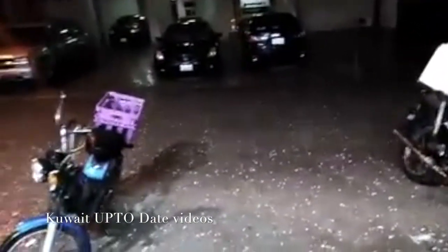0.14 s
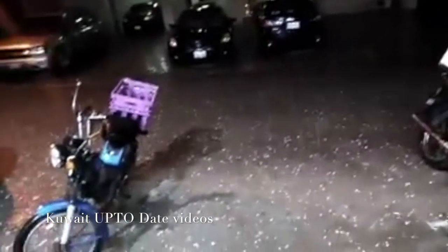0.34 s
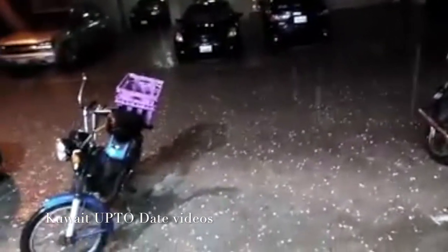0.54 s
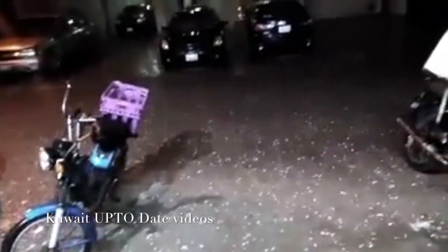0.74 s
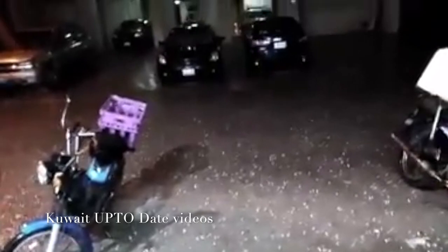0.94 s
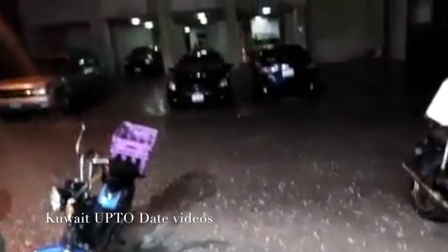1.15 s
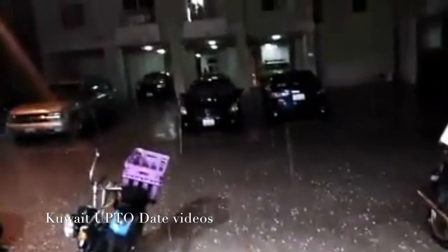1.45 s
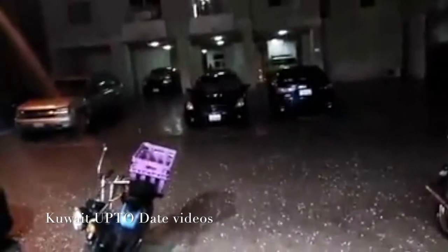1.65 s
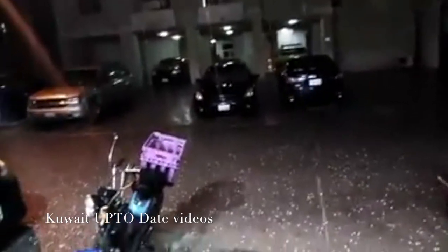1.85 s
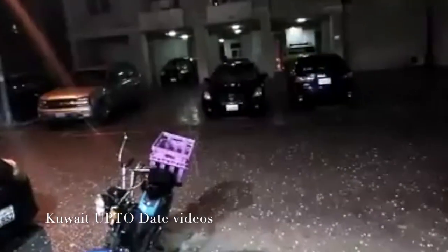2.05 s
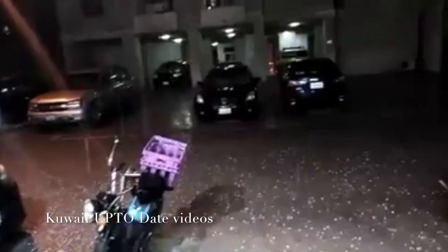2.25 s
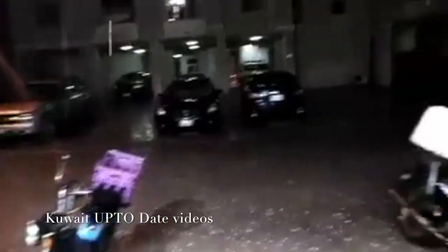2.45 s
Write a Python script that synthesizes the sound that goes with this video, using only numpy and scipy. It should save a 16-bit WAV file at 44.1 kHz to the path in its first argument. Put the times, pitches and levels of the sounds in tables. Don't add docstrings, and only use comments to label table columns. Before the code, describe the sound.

Dense hail hisses and crackles on a paved yard, drumming in flurries on car roofs

```python
import sys
import numpy as np
from scipy import signal
from scipy.fft import rfft, irfft, next_fast_len
from scipy.io import wavfile
from scipy.ndimage import uniform_filter1d

SR = 44100
rng = np.random.default_rng(int(sys.argv[2]) if len(sys.argv) > 2 else 0)


def gain_from_db(level_db):
    decades = np.asarray(level_db, float) / 20
    return 10 ** decades


def generate_wav(signal):
    frames = np.transpose(np.atleast_2d(signal))
    scaled = np.clip(frames, -1, 1) * 32767
    pcm = np.round(scaled).astype(np.int16)
    wavfile.write(sys.argv[1], SR, pcm)


N = 114660
TIME_S = np.arange(N) / SR

SPLIT_HZ, TOP_EDGE_HZ = 4520, 15400


def rms_one(x):
    return x / np.sqrt(np.mean(x ** 2) + 1e-20)


def at_hz(points, hz):
    table_hz, value = np.transpose(points)
    return np.interp(np.log(hz), np.log(table_hz), value)


def drift(rate_hz):
    r = np.exp(-80 * np.pi * rate_hz / SR)
    noise = rng.standard_normal(N // 40 + 2002)
    slow = signal.lfilter([1], [1, -2 * r, r * r], noise)[2000:]
    return np.interp(np.arange(N) / 40, np.arange(len(slow)), rms_one(slow))


def shaped(x, response):
    size = next_fast_len(N + 4096)
    hz = np.arange(1, size // 2 + 2) * SR / size
    return irfft(rfft(x, size) * response(hz), size)[:N]


def window(start_s, end_s):
    return np.interp(TIME_S, [start_s - .0001, start_s, end_s, end_s + .0001], [0, 1, 1, 0])


def impacts(per_s):
    size_spread_db = 2.5
    sizes = gain_from_db(size_spread_db * np.minimum(rng.exponential(1, N), 5))
    signs = rng.choice([-1, 1], N)
    return sizes * signs * (rng.random(N) < per_s / SR)


# start_s, level_db
FLURRY_LEVELS = [(0, -20.5), (.15, -20), (.5, -19.5), (.6, -20), (.72, -16.5), (.8, -22.5), (.97, -18.5),
                 (1.08, -22.5), (1.22, -15.5), (1.29, -22), (1.35, -15.5), (1.519, -22.5), (1.76, -19.5),
                 (1.842, -18.5), (1.939, -16), (2.02, -24), (2.2, -20.5), (2.6, -21.5)]


def flurry_db():
    start_s, level_db = np.transpose(FLURRY_LEVELS)
    return np.interp(TIME_S, start_s, level_db - level_db.mean())


def roofs():
    gain_db, follows_flurries = -22.5, 1.25
    hits_per_s, ring_cycles = 3000, 12.7
    hits = impacts(hits_per_s) + 1e-18
    struck_mode = rng.integers(0, 24, N)
    ringing = 0
    for mode, hz in enumerate(np.geomspace(349, 3094, 24)):
        r = gain_from_db(-60 * hz / (ring_cycles * SR))
        w = 2 * np.pi * hz / SR
        resonator = [0, np.sin(w)], [1, -2 * r * np.cos(w), r * r]
        ringing = ringing + np.sqrt(hz) * signal.lfilter(*resonator, hits * (struck_mode == mode))
    ringing = rms_one(shaped(ringing, lambda hz: hz < SPLIT_HZ))
    return gain_from_db(follows_flurries * flurry_db() + gain_db) * ringing


def paving(spectrum, low_hz, high_hz, patchy_db, gust_db):
    stones_per_s = 14000
    ticks = [impacts(stones_per_s), impacts(stones_per_s)]
    gust = drift(2.5)
    hail = 0
    edges_hz = 25 * 2 ** (np.arange(30) / 3)
    for k, (low, high) in enumerate(zip(edges_hz, edges_hz[1:])):
        if high > low_hz and low < high_hz:
            bandpass = signal.butter(2, [low, high], "band", fs=SR, output="sos")
            band = signal.sosfilt(bandpass, ticks[k % 2])
            hail = hail + band * gain_from_db(patchy_db * drift(12.6) + gust_db * gust)
    return rms_one(shaped(hail, lambda hz: gain_from_db(at_hz(spectrum, hz)) * (hz > low_hz) * (hz < high_hz)))


# pitch_hz, level_db
BODY_COLOUR = [(30, -28), (63, -19.5), (120, -3.5), (300, -6), (500, -9.5), (1300, -5), (2500, -2.5),
               (4400, -3.5)]


def paving_body():
    gain_db, follows_flurries = -12.5, 0.33
    hail = paving(BODY_COLOUR, 20, SPLIT_HZ, patchy_db=1.04, gust_db=0.31)
    return gain_from_db(gain_db + follows_flurries * flurry_db()) * hail


# pitch_hz, level_db
TOP_COLOUR = [(4600, -1.5), (6530, 1), (7600, -1.5), (9370, -4), (12700, -5.5), (13100, -10), (14500, -11),
              (15500, -13)]


def paving_top():
    gain_db, follows_flurries = -13.5, 0.057
    hail = paving(TOP_COLOUR, SPLIT_HZ, TOP_EDGE_HZ, patchy_db=1.0, gust_db=0.28)
    return gain_from_db(gain_db + follows_flurries * flurry_db()) * hail


def thinned(x, low_hz, frame, lines, share):
    hole_db, weak_share = -22, 0.73
    hz, _, z = signal.stft(x, SR, nperseg=frame)
    weak = abs(z) < weak_share * uniform_filter1d(abs(z), size=16, axis=0)
    luck = np.kron(rng.random(z.shape), np.ones((lines, 2)))[:len(hz), :z.shape[1]]
    lost = (weak | (luck < share)) & (hz[:, None] > low_hz)
    return signal.istft(z * np.where(lost, gain_from_db(hole_db), 1), SR, nperseg=frame)[1][:N]


def late_copy(hz):
    lead_lag, plain_lag, plain_hz = 23, 824, 8625

    def lag(samples):
        return np.exp(-2j * np.pi * hz * samples / SR)

    chain = lag(lead_lag)
    for samples, gain in [(202, 0.55), (279, 0.52), (314, 0.56)]:
        g = np.clip(gain * (1.1 - hz / plain_hz), 0, .9)
        chain = chain * (lag(samples) - g) / (1 - g * lag(samples))
    return -np.where(hz < plain_hz, chain, lag(plain_lag))


# pitch_hz, level_db
COPY_LEVEL = [(60, -8.5), (130, -18.5), (290, -9.5), (640, -8), (1410, 0), (3100, -2), (6820, 0.5),
              (15000, -0.5)]
# pitch_hz, left_minus_right_db
LEFT_LEAN = [(100, -1), (400, -2.5), (1200, 0), (2500, 1.5), (6400, 4), (8400, 3.5), (8700, -4.5),
             (15000, -3.5)]


def widened(x):
    loose_share = .3

    def centre(hz):
        return 1 / np.sqrt(1 + gain_from_db(2 * at_hz(COPY_LEVEL, hz)))

    def side(hz):
        whole = gain_from_db(at_hz(COPY_LEVEL, hz))
        lean = np.tanh(at_hz(LEFT_LEAN, hz) * np.log(10) / 20) * (1 + whole ** 2) / 2
        lean = np.clip(lean, -whole, whole)
        return centre(hz) * (lean + np.sqrt(whole ** 2 - lean ** 2) * late_copy(hz))

    loose = shaped(np.roll(x, N // 3), lambda hz: centre(hz) * gain_from_db(at_hz(COPY_LEVEL, hz)))
    tied = shaped(x, side)
    return shaped(x, centre), np.sqrt(1 - loose_share ** 2) * tied + loose_share * loose


# dull_start_s, right_mute_s, full_again_s, width_start_s, width_back_s
FALTER_TIMES = [
    (.7725, .7815, .787, .796, .83),
    (1.763, 2.0615, 2.067, 2.07, 2.105),
]


def falters():
    linger_s, linger_db, mute_db = .022, -30, -24
    dull, width, right, thin = np.zeros(N), np.ones(N), np.ones(N), np.zeros(N)
    for start, mute, full, opens, back in FALTER_TIMES:
        trace = gain_from_db(linger_db) * window(start, min(full, start + linger_s))
        dull = dull + window(start, full) - trace
        width = width * np.interp(TIME_S, [start - .0004, start, opens, back], [1, 0, 0, 1])
        right = right * (1 - (1 - gain_from_db(mute_db)) * window(mute, full))
        thin = thin + window(full + 0.00046, full + .0085)
    return dull, width, right, thin


def scene():
    body = thinned(paving_body() + roofs(), low_hz=1300, frame=3760, lines=5, share=.15)
    top = thinned(paving_top(), low_hz=4500, frame=3760, lines=5, share=.05)
    top = thinned(top, low_hz=13900, frame=2600, lines=18, share=.4)
    centre, side = widened(body + top)
    dull, width, right, thin = falters()

    mono_lift_db, tick_s, tick_db = 0.5, 1.929, -21
    bass = shaped(body, lambda hz: hz < 1100)
    tick = gain_from_db(tick_db) * (np.arange(N) == int(tick_s * SR))
    mono = gain_from_db(mono_lift_db) * (body - thin * bass) + (1 - dull) * top + tick

    gap = 1 - (1 - gain_from_db(-17)) * window(1.763, 1.772)
    mid = (width * centre + (1 - width) * mono) * gap
    return np.array([mid + width * side, (mid - width * side) * right])


def band_limit(x):
    return signal.sosfilt(signal.butter(12, 15660, fs=SR, output="sos"), x)


def record(dry):
    overload = 1.15
    rumble_cut = signal.butter(2, 70, "high", fs=SR, output="sos")
    heard = np.clip(signal.sosfilt(rumble_cut, dry), -overload, overload)
    return band_limit(heard)


dry = scene()
out = record(dry)
generate_wav(out)
```